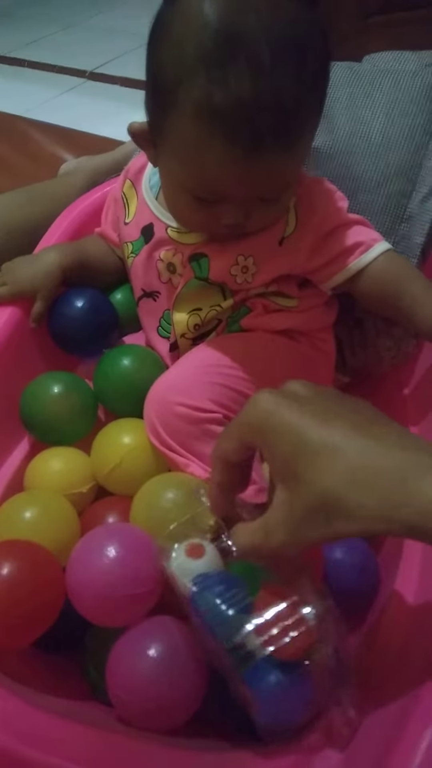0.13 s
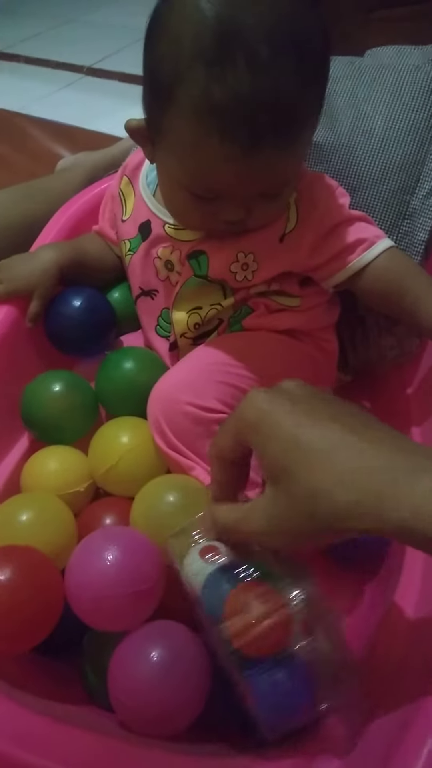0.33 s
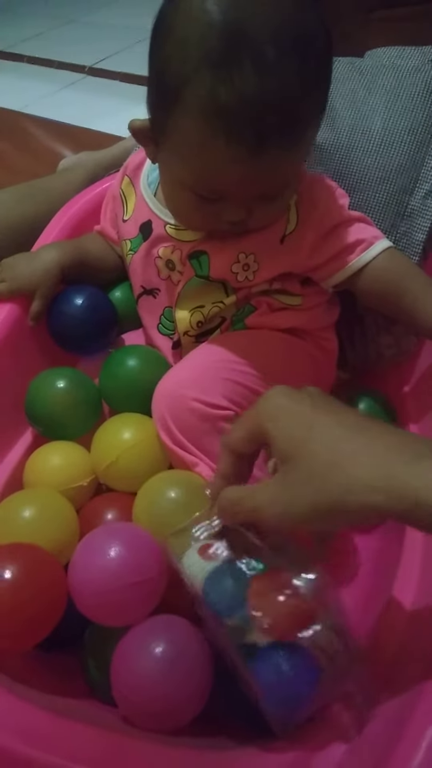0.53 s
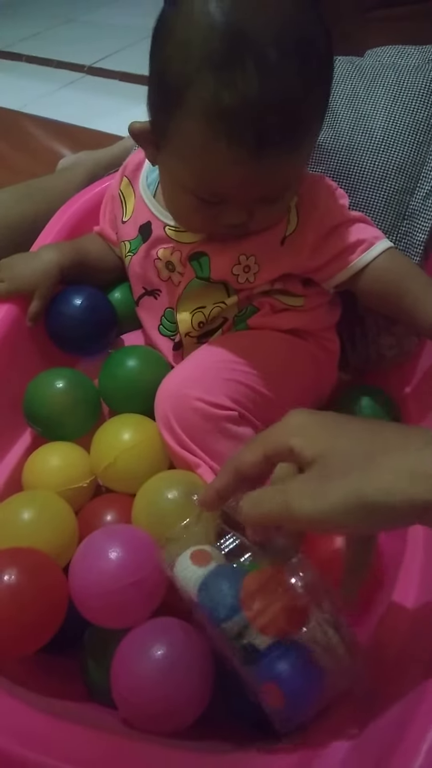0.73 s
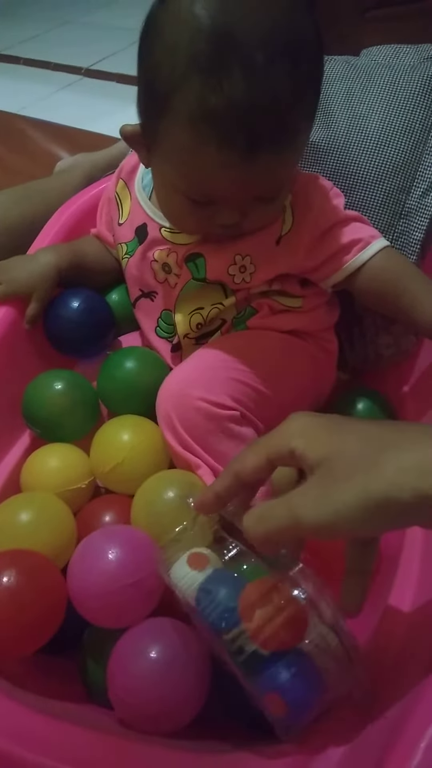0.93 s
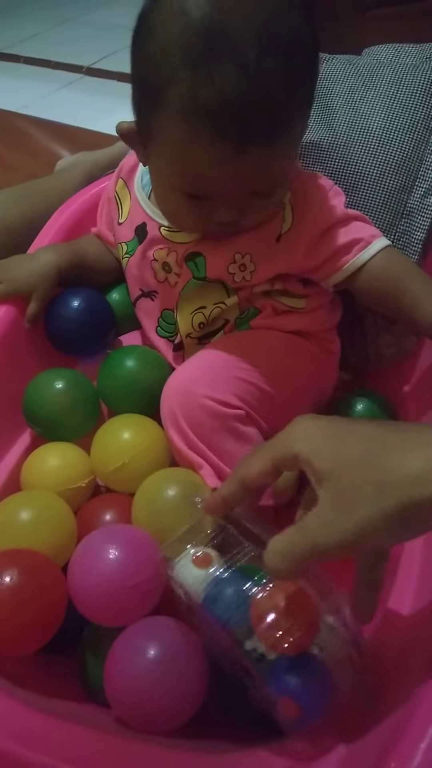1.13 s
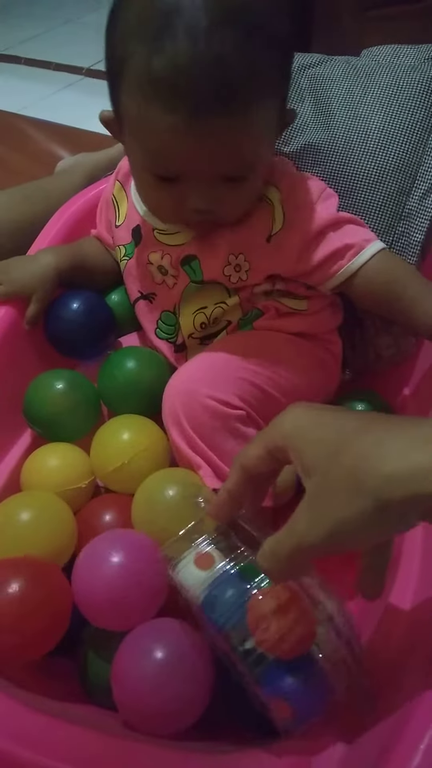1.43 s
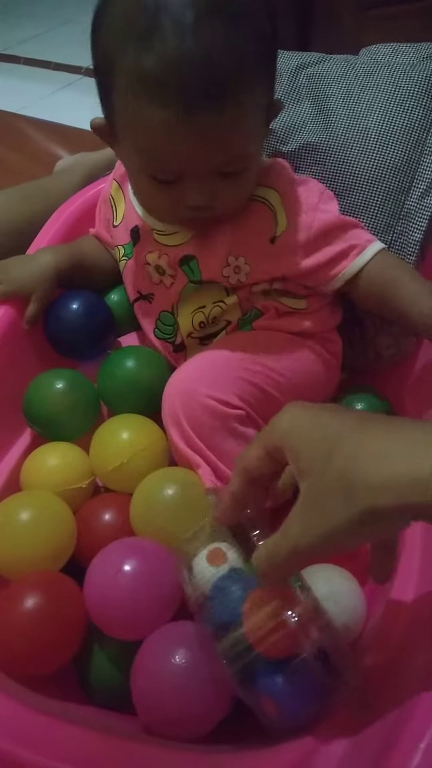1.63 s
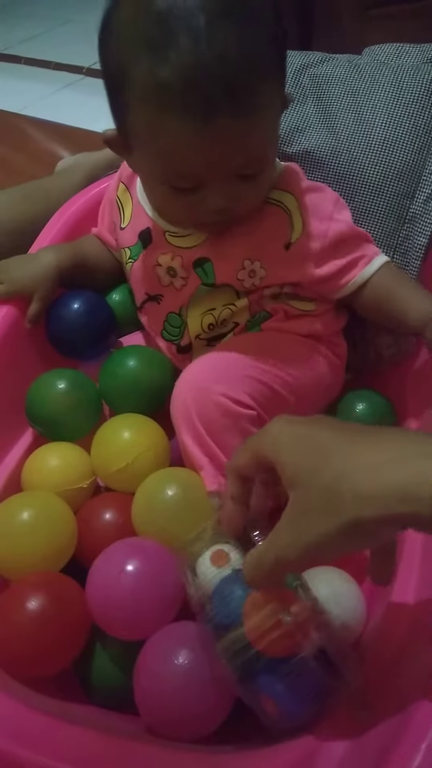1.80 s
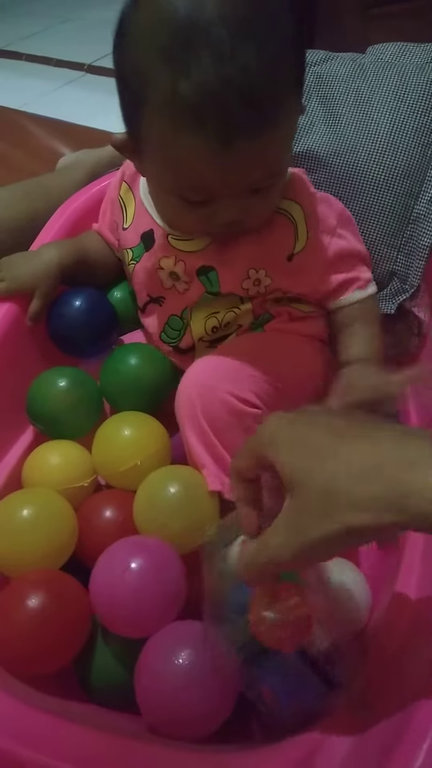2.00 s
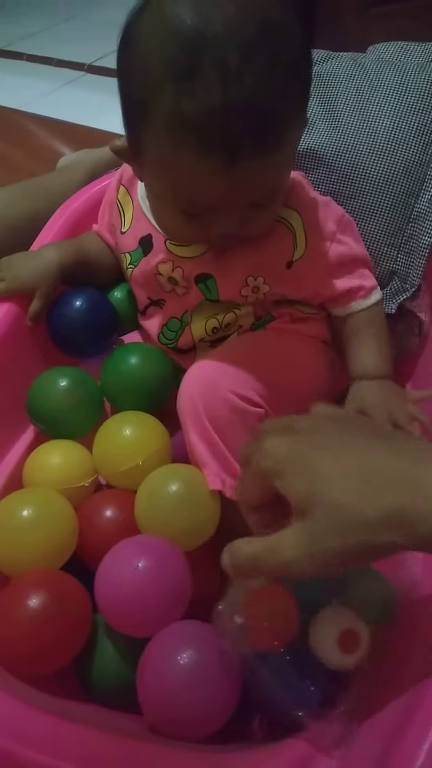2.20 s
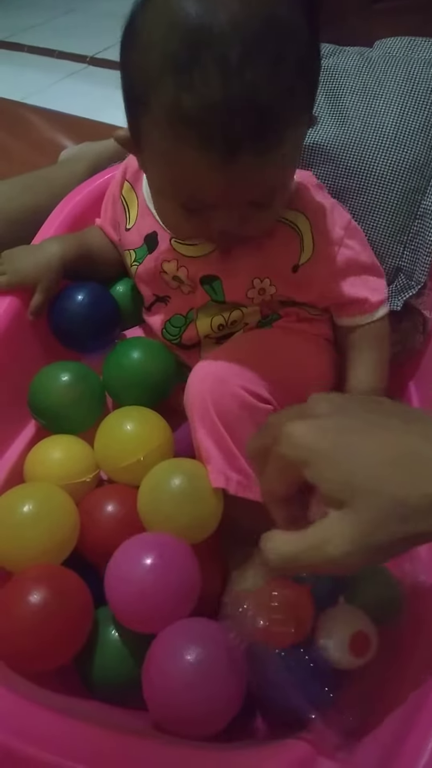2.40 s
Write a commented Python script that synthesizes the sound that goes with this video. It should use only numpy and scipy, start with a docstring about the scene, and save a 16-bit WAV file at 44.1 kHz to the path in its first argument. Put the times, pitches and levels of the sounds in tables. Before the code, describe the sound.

A hand shakes a thin plastic container of balls: sharp clack, light ticking, then busier rattling

```python
"""Plastic balls in a thin container

A hand moves a thin clear plastic container of hollow plastic balls inside a plastic tub of more balls.
Clacks are short rough contacts that ring groups of plastic modes; one ball judders along the wall.
Between them dense random ticks rattle the same modes, and the tub thumps as pairs of low decaying tones.
A small hard room of feedback delays answers the hits; shaped noise and a thin hum lie below."""
import sys
import numpy as np
from scipy import signal
from scipy.fft import rfft, irfft, next_fast_len
from scipy.io import wavfile
from scipy.ndimage import uniform_filter1d

SR = 44100
rng = np.random.default_rng(int(sys.argv[2]) if len(sys.argv) > 2 else 0)


def bounce(signal):
    """Save signal as a 16-bit WAV file at the path given by the first command-line argument."""
    frames = np.transpose(np.atleast_2d(signal))
    limited = np.clip(frames, -1, 1)
    pcm = np.round(limited * 32767).astype(np.int16)
    wavfile.write(sys.argv[1], SR, pcm)


N = 112454

# Clacks of ball on ball and ball on wall. Each row: start in seconds, peak level in dB of the middle modes,
# of the low modes and of the wall treble, nominal contact length in ms, ball pitch in Hz.
CLACKS = [(0.0288, -63.5, -58.5, -68, 3.3, 1860), (0.0403, -54, -54, -67, 3.8, 2120),
          (0.0727, -59, -61, -75, 7.1, 1900), (0.1048, -58, -59.5, -80, 6.3, 1810),
          (0.1533, -52, -51, -67, 5.2, 2080), (0.22, -39.5, -34, -35, 7.1, 2030),
          (0.2297, -32.5, -40.5, -26, 4.2, 2100), (0.2333, -33, -51, -26.5, 2, 2390),
          (0.2331, -31, -33.5, -23.5, 3.1, 2030), (0.2417, -35, -29, -43, 2.6, 1920),
          (0.2514, -56, -38.5, -59, 5.4, 2020), (0.2615, -40.5, -45.5, -44, 2.7, 1750),
          (0.27, -63, -43, -41, 3.2, 2020), (0.4622, -62, -70, -68, 3.1, 1740),
          (0.4867, -58.5, -58, -59.5, 5.2, 1900), (0.5049, -43, -50, -50, 2.15, 2080),
          (0.5242, -51.5, -53, -53.5, 10.6, 1810), (0.589, -44.5, -46, -56, 5.7, 2070),
          (0.597, -47, -43.5, -47.5, 4.0, 2180), (0.61, -60, -48, -58, 4.3, 1860),
          (0.6657, -42, -47.5, -44, 3.7, 2110), (0.6972, -68, -52, -49, 3.6, 2080),
          (0.7649, -48.5, -49.5, -52, 3.5, 2300), (0.7729, -62, -49.5, -55, 2.7, 2200),
          (0.8053, -67, -68, -63.5, 4.4, 1920), (0.8469, -60.5, -62.5, -67.5, 5, 1740),
          (0.923, -58.5, -49, -64.5, 4.7, 1940), (0.9455, -57.5, -57.5, -72, 3.3, 1820),
          (0.9785, -57.5, -71, -76.5, 4.0, 2310), (1.1518, -48, -59, -58, 2.26, 2034),
          (1.1782, -71.5, -68, -80.5, 4.2, 1826), (1.255, -63, -67, -94.5, 4.0, 2060),
          (1.2835, -64, -75, -81.5, 3.5, 1920), (1.3414, -72.5, -63, -97, 5.8, 2400),
          (1.352, -72, -61, -90.5, 4.0, 1850), (1.4129, -55, -58.5, -68, 7.3, 1880),
          (1.4236, -57, -56, -61, 2.8, 2080), (1.4454, -43, -44.5, -38.5, 2.2, 2220),
          (1.5233, -47, -49.5, -43, 2.4, 2080), (1.5309, -46.5, -50, -59, 4.0, 2080),
          (1.5404, -48, -49, -64, 4.7, 2100), (1.5526, -49.5, -48.5, -58, 4.0, 2070),
          (1.6187, -53, -57.5, -56.5, 2.4, 2000), (1.6518, -60, -70, -63.5, 4.3, 2384),
          (1.7781, -65.5, -75, -87, 4.0, 1840), (1.8641, -67, -71, -76.5, 4.0, 2260),
          (1.8811, -57.5, -62.5, -70, 2.1, 2100), (1.922, -47.5, -56.5, -43, 3.2, 2140),
          (1.9582, -56, -60, -49, 4.4, 1930), (2.0661, -41, -52, -55, 4.2, 1860),
          (2.0839, -38.5, -45.5, -43, 3.9, 1910), (2.0917, -38, -49.5, -45.5, 4.9, 1960),
          (2.0973, -40, -49, -45, 4.9, 1800), (2.1161, -35, -54, -54, 2.5, 1700),
          (2.1166, -41, -54, -41.5, 6.7, 1930), (2.1384, -41, -52, -33, 2.6, 1850),
          (2.1626, -35.5, -43, -44, 4.0, 1870), (2.1678, -33, -48, -36, 2.4, 1920),
          (2.1972, -45, -54, -64, 2.7, 2030), (2.2191, -41, -38, -47, 4.3, 1820),
          (2.2264, -31.5, -38, -44, 7.2, 1920), (2.2336, -39.5, -42, -33.5, 2.96, 1840),
          (2.2366, -35.5, -40.5, -43, 7.5, 2275), (2.2614, -39, -43.5, -46, 3.4, 1830),
          (2.3013, -41.5, -44, -46, 3.8, 2040), (2.3291, -50, -59, -69, 5.4, 1890),
          (2.3641, -42.5, -52, -49, 5, 1910), (2.3883, -51.5, -48.5, -54.5, 7.3, 2280),
          (2.4575, -59, -56, -69, 3, 1920), (2.5157, -56, -71, -75.5, 3.4, 1890),
          (2.5263, -53.5, -57.5, -82, 5.8, 1960)]
# Thumps of the tub. Each row: start in seconds, nominal level in dB, lower pitch in Hz.
THUMPS = [(0.109, -61.5, 413), (0.232, -35.5, 307), (0.428, -53.5, 293), (0.487, -54.5, 294),
          (0.568, -47, 240), (0.6, -34, 309), (0.621, -40.5, 262), (0.644, -41, 262), (0.667, -45, 380),
          (0.767, -40.5, 291), (0.824, -51.5, 268), (0.849, -55, 270), (0.927, -54, 257.5),
          (1.001, -51.5, 256), (1.347, -64, 417), (1.444, -49.5, 331), (1.626, -53.5, 249),
          (1.65, -51, 248), (1.679, -52, 254.3), (1.711, -57, 253), (1.884, -61.5, 429), (2.166, -40, 233),
          (2.195, -50, 370), (2.231, -39, 194), (2.269, -39.5, 245), (2.39, -49, 267)]
# Rattle between the clacks, before RATTLE_DB. Each row: time in seconds, level in dB around 2 kHz,
# of the low modes, of the treble, of the bass.
RATTLE = [(0.0, -59, -56, -66, -55.5), (0.198, -62.5, -64, -89.5, -92), (0.229, -35, -33, -32, -38),
          (0.25, -46, -44, -50, -40), (0.28, -42.5, -38.5, -41.5, -45), (0.38, -46.5, -49, -49, -52.5),
          (0.469, -83, -63, -68, -70.5), (0.56, -64, -55.5, -58, -56.5), (0.6, -47.5, -54, -60, -45.5),
          (0.65, -58, -56, -50.5, -55), (0.669, -51, -48.5, -54, -52.5), (0.771, -59.5, -59.5, -61, -53.5),
          (0.89, -83.5, -87, -83, -72.5), (0.932, -55, -54, -67.5, -61.5), (1.111, -102, -104, -99, -90.5),
          (1.16, -56.5, -60, -70, -83.5), (1.19, -71.5, -73.5, -82, -94.5),
          (1.33, -67, -73.5, -92.5, -79.5), (1.43, -58.5, -70, -73.5, -63), (1.499, -58, -58.5, -62, -68),
          (1.529, -52, -56, -51, -59.5), (1.678, -53, -54.5, -67, -68), (1.839, -75.5, -88, -99, -83.5),
          (1.93, -51, -67, -56.5, -85.5), (2.011, -59, -67.5, -57.5, -89.5), (2.06, -47, -46.5, -49.5, -65),
          (2.17, -45, -44, -46.5, -48.5), (2.23, -40.5, -42, -44.5, -41.5), (2.26, -47, -44, -51, -45),
          (2.38, -44.5, -46.5, -54.5, -54.5), (2.55, -82.5, -82, -88.5, -83)]
# Resonances of balls, container wall and tub. Each row: pitch in Hz, relative drive in dB, T60 in seconds.
LOW_MODES = [(652, -2.5, 0.018), (818.5, 7.5, 0.013), (920, 5.5, 0.021), (1075, 0.5, .03),
             (1340, 3.5, 0.01)]
MIDDLE_MODES = [(1787, -5.5, 0.011), (1866, -5.5, 0.025), (2055, -4.5, 0.011), (2248, -6.5, 0.024),
                (2336, -3.5, 0.0085)]
UPPER_MODES = [(2699, -6.5, 0.011), (2920, -1, 0.0042)]
WALL_MODES = [(3966, 2.5, 0.0065), (6040, 4, 0.0037), (7065, 2, 0.0043), (7640, -0.5, 0.0072),
              (8300, 1.5, 0.0058), (9850, 8.5, 0.0013), (10370, 1, 0.0075), (11100, 3.5, 0.0017),
              (13400, 3.5, 0.00082), (14800, -7.5, .003)]
BASS_MODES = [(163, -3.5, 0.035), (182, -2.5, 0.036), (276, 7, 0.02), (327, -5.5, 0.044), (407, 9, 0.018),
              (556.6, -9, .03)]
# Shares of the nominal contact length felt by the middle, upper, low and wall modes, in that order.
CONTACT_STRETCH = [1, 1.7, 1, 1.3]
# Decay of the room. Each row: frequency in Hz, T60 in seconds.
ROOM_T60 = [(150, 0.16), (1000, 0.26), (4000, 0.24), (14000, 0.1)]
# Colour of the room noise. Each row: frequency in Hz, relative density in dB per Hz.
FLOOR = [(18, -41), (30, -10), (90, 6), (632, -26.5), (1100, -11.5), (1590, -26.5), (1760, -8.5),
         (2120, -8), (3490, -27.5), (4080, -22), (16000, -48)]

FIRST_TOUCH = 5.4  # first sharp touch of a 1 ms contact, against the rough rest
RISE_SHARE = 0.16  # rise time as a share of the contact length
OFF_PITCH_DB = 55  # loss per octave of the middle modes away from a ball's pitch
STRIKE_SPREAD_DB = 3.0  # unevenness of the low and upper modes from clack to clack
UPPER_FOLLOWS_TREBLE, UPPER_DB = 0.33, -3.5  # upper modes of a clack lie between middle and treble level
# Treble under BRIGHT_DB loses this many dB per octave for each dB
DULL_PER_DB, BRIGHT_DB, DULL_ABOVE_HZ = 0.6, -45, 8500
JUDDER_START_S, JUDDER_PER_S, JUDDER_COUNT, JUDDER_MS, JUDDER_HZ = 0.3515, 117.5, 6, 1.2, 2150
JUDDER_DB, JUDDER_LOW_DB, JUDDER_TREBLE_DB = -43, -51, -53
RATTLE_DB, RATTLE_PER_S, RATTLE_SPREAD_DB, CRINKLE_PER_S = -9, 390, 2.5, 7000
THUMP_T60_S, THUMP_PUSH_MS = 0.054, 1.3
ROOM_DB, SCATTER_MS = -27, 3.7
FLOOR_DB, HUM_HZ, HUM_DB, HUM_T60_S = -84, 405, -95, 0.4
BASS_CUT_HZ, TOP_CUT_HZ = 104, 16500


def amp(db):
    """Turn dB into gain."""
    return 10 ** (np.asarray(db) / 20)


def rms_one(x):
    """Scale to an rms of 1."""
    return x / np.sqrt(np.mean(x ** 2) + 1e-20)


def at_hz(points, hz):
    """Read a table along log frequency."""
    table_hz, values = np.transpose(points)
    return np.interp(np.log(hz), np.log(table_hz), values)


def ring(x, hz, t60):
    """One mode: a two-pole resonator that falls 60 dB in t60 seconds."""
    r, w = amp(-60 / (t60 * SR)), 2 * np.pi * hz / SR
    return signal.lfilter([0, np.sin(w)], [1, -2 * r * np.cos(w), r * r], x + 1e-18)


def body(x, modes, more_db=lambda hz: 0):
    """Ring a group of modes with alternating signs, kept to its own band; more_db(Hz) weights each mode."""
    low_edge, high_edge = 0.71 * modes[0][0], min(1.49 * modes[-1][0], 0.45 * SR)
    band = signal.butter(2, [low_edge, high_edge], "band", fs=SR, output="sos")
    rung = 0
    for k, (hz, db, t60) in enumerate(modes):
        rung = rung + (-1) ** k * ring(x * amp(db + more_db(hz)), hz, t60)
    return signal.sosfilt(band, rung)


def dulled(treble_db):
    """Weak contacts are softer and reach the highest modes less."""
    weakness_db = np.minimum(treble_db - BRIGHT_DB, 0)
    return lambda hz: DULL_PER_DB * weakness_db * max(np.log2(hz / DULL_ABOVE_HZ), 0)


def grains(per_s, spread_db):
    """Tiny contacts at random times, of uneven size and either sign."""
    size = amp(spread_db * np.minimum(rng.exponential(1, N), 4)) * rng.choice([-1, 1], N)
    return size * (rng.random(N) < per_s / SR)


def contacts(rows):
    """Each clack is a touch, sharper when brief, then a rough contact; ball pitch favours its middle modes."""
    s, mid_db, low_db, treble_db, ms, pitch = np.transpose(rows)[:, :, None]
    upper_db = mid_db + UPPER_FOLLOWS_TREBLE * (treble_db - mid_db) + UPPER_DB
    length = 3000  # samples
    t, out = np.arange(length) / SR, np.zeros(N + length)
    contact_s = np.maximum(ms, 0.2) / 1000
    place = (s * SR).astype(int) + np.arange(length)
    noise = rng.standard_normal((len(s), 4, length))

    def near_pitch(hz):
        return -OFF_PITCH_DB * abs(np.log2(hz / pitch))

    def uneven(hz):
        return STRIKE_SPREAD_DB * rng.standard_normal(s.shape)

    groups = [(MIDDLE_MODES, mid_db, near_pitch), (UPPER_MODES, upper_db, uneven),
              (LOW_MODES, low_db, uneven), (WALL_MODES, treble_db, dulled(treble_db))]
    for k, (modes, db, more_db) in enumerate(groups):
        age = t / (CONTACT_STRETCH[k] * contact_s)
        force = (1 - np.exp(-age / RISE_SHARE)) * np.exp(-2 * age) * noise[:, k]
        force[:, :1] = FIRST_TOUCH / ms * np.sign(noise[:, k, :1])
        rung = body(force, modes, more_db)
        # peak of the loudest 200-sample stretch, taken as a sine
        peak = np.sqrt(2 * uniform_filter1d(rung ** 2, size=200).max(axis=1, keepdims=True))
        np.add.at(out, place, rung / peak * amp(db))
    return out[:N]


def judder():
    """A ball judders along the wall: an even run of small clacks."""
    levels = (JUDDER_DB, JUDDER_LOW_DB, JUDDER_TREBLE_DB)
    starts = [JUDDER_START_S + k / JUDDER_PER_S for k in range(JUDDER_COUNT)]
    return contacts([(s, *levels, JUDDER_MS, JUDDER_HZ) for s in starts])


def rattle():
    """Dense small collisions ring all modes; the thin wall also crinkles finely and the tub rumbles."""
    s, *levels = np.transpose(RATTLE)
    t = np.arange(N) / SR
    mid_db, low_db, treble_db, bass_db = (np.interp(t, s, db) + RATTLE_DB for db in levels)
    upper_db = mid_db + 0.59 * (treble_db - mid_db) - 2.0
    # the ticks are shared by all but the bass; each group adds finer grains of its own
    ticks = grains(RATTLE_PER_S, RATTLE_SPREAD_DB)
    middle = body(ticks + 0.8 * grains(1300, 1.4), MIDDLE_MODES)
    upper = body(ticks + 0.34 * grains(1500, 2.2), UPPER_MODES)
    low = body(ticks + 0.86 * grains(1000, 4.0), LOW_MODES)
    crinkle = body(ticks + 0.84 * grains(CRINKLE_PER_S, 0.98), WALL_MODES, dulled(treble_db))
    rumble = body(grains(450, 1.2), BASS_MODES)
    groups = [(mid_db, middle), (upper_db, upper), (low_db, low), (treble_db, crinkle), (bass_db, rumble)]
    return sum(amp(db) * rms_one(rung) for db, rung in groups)


def thumps():
    """Soft pushes set the tub's wall ringing at a pair of low pitches."""
    length = 8000  # samples
    out, t = np.zeros(N + length), np.arange(length) / SR
    push = 1 - np.exp(-1000 * t / THUMP_PUSH_MS)
    for s, db, hz in THUMPS:
        lower = np.sin(2 * np.pi * hz * t)
        higher = 0.26 * np.sin(2 * np.pi * (1.4 * hz * t + rng.random()))
        i = int(s * SR)
        out[i:i + length] += amp(db - 60 * t / THUMP_T60_S) * push * (lower + higher)
    return out[:N]


def room(x):
    """Forty feedback delays whose loss follows the decay table, fed through a short scatter."""
    size = next_fast_len(N + SR)
    hz = np.arange(size // 2 + 1) * SR / size + 1
    t60, echo = at_hz(ROOM_T60, hz), 0
    for k, lag_s in enumerate(rng.uniform(0.008, 0.05, size=40)):
        loop = amp(-60 * lag_s / t60) * np.exp(-2j * np.pi * hz * lag_s)
        echo = echo + (-1) ** k * loop / (1 - loop)
    scatter = rng.standard_normal(1500) * np.exp(-np.arange(1500) / SR * 1000 / SCATTER_MS)
    scatter = scatter / np.sqrt(np.sum(scatter ** 2))
    return irfft(rfft(x, size) * echo * rfft(scatter, size), size)[:N]


def room_noise():
    """Faint steady shaped noise, with a thin wavering hum from noise through one narrow resonance."""
    hz = np.arange(N // 2 + 1) * SR / N + 1
    hiss = irfft(rfft(rng.standard_normal(N)) * amp(at_hz(FLOOR, hz)), N)
    hum = ring(rng.standard_normal(N), HUM_HZ, HUM_T60_S)
    return amp(FLOOR_DB) * rms_one(hiss) + amp(HUM_DB) * rms_one(hum)


def scene():
    """Clacks, judder and thumps with their room, plus the dry rattle, thin in the deep bass; noise below."""
    hits = contacts(CLACKS) + judder() + thumps()
    near = hits + amp(ROOM_DB) * room(hits) + rattle()
    bass_cut = signal.butter(3, BASS_CUT_HZ, "high", fs=SR, output="sos")
    return (signal.sosfilt(bass_cut, near) + room_noise())[None]


def record(dry):
    """Cut the top steeply: 60 dB down from TOP_CUT_HZ upward."""
    return signal.sosfilt(signal.cheby2(12, 60, TOP_CUT_HZ, fs=SR, output="sos"), dry)


dry = scene()
out = record(dry)
bounce(out)
```